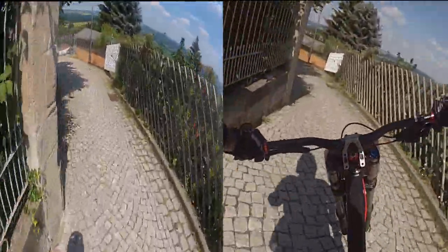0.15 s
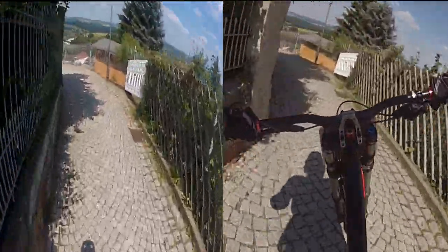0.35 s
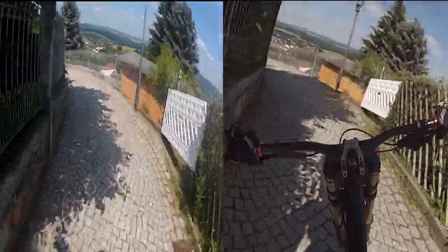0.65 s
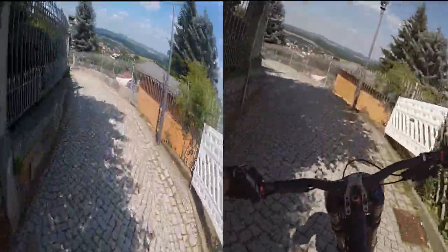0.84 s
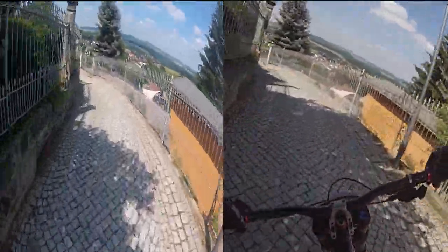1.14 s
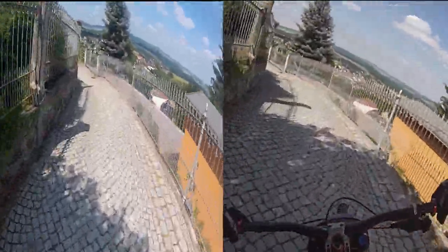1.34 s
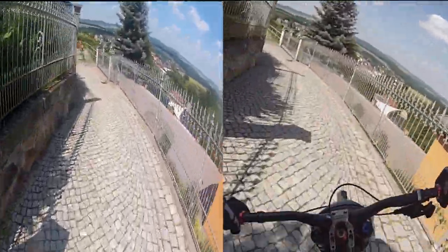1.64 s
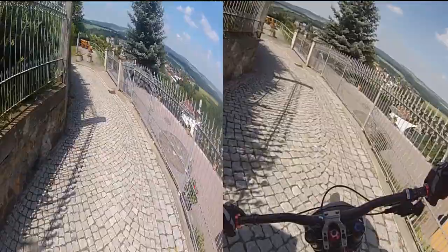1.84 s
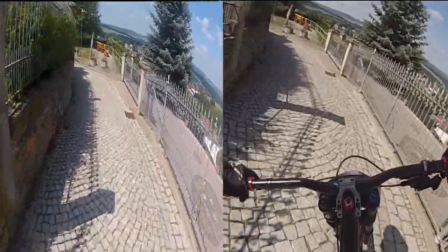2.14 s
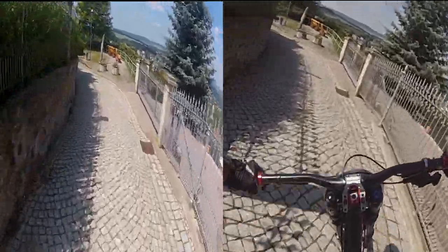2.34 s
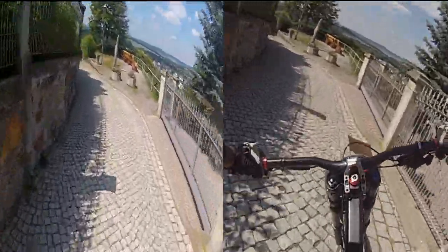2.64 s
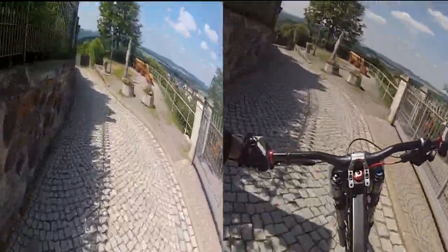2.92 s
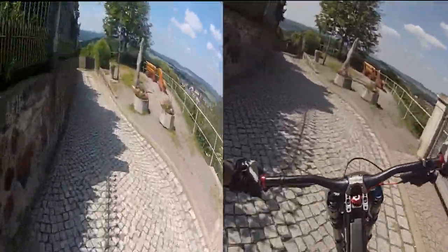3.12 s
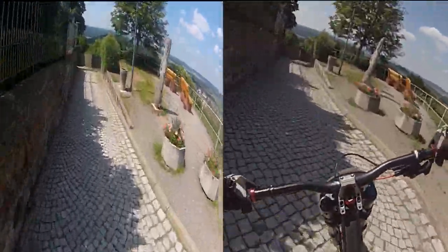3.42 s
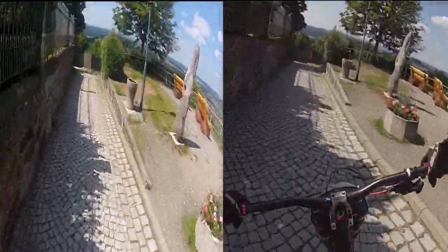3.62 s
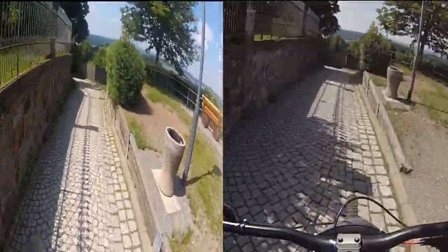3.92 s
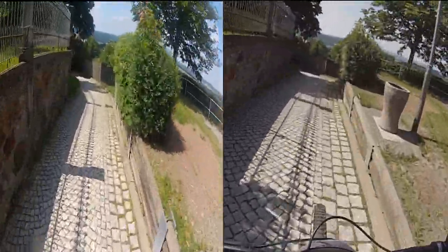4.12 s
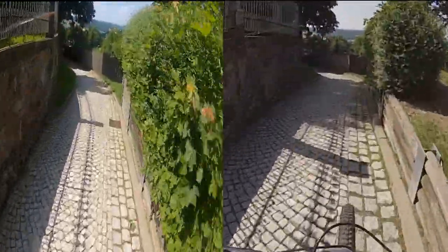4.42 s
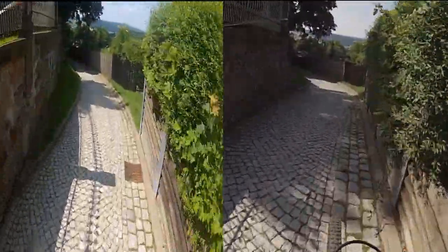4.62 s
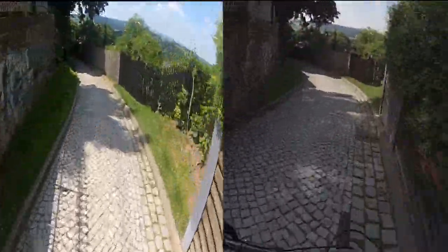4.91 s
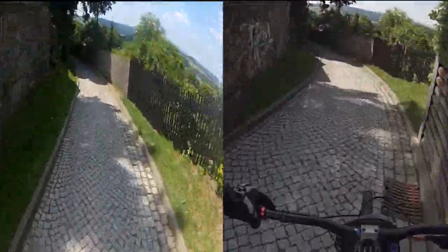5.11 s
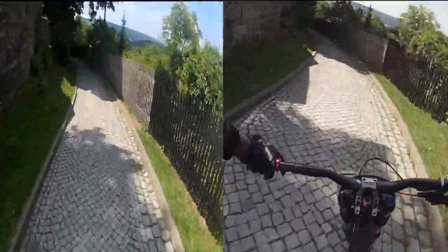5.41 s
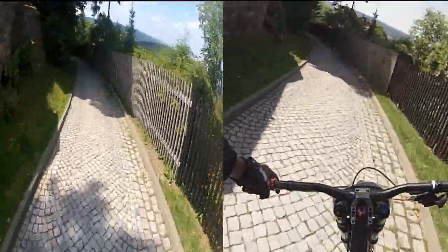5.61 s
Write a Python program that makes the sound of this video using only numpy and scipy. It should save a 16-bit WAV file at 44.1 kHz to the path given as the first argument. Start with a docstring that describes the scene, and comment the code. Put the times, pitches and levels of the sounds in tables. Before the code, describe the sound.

Rough, continuous cobblestone rumble from a bicycle, with thuds, dry clacks, chain ticks, a faint freehub buzz and lumpy wind on the microphone.

```python
"""A cobbled lane: a mountain bike coasts down it, heard from helmet and chest microphones, mixed to mono.
Wind is lumpy shaped noise; tyres and frame are resonances struck by uneven streams of stone blows.
Filtered bursts knock, thud and tick, shaped noise and grit hiss under the tread, the freehub buzzes.
Loose parts clatter, the chain jangles and the deep rumble surges around single pitches.
The chest signal is held at a slow clock, which adds fizz, and the mix overloads softly on peaks."""
import sys
import numpy as np
from scipy import signal
from scipy.fft import rfft, irfft
from scipy.io import wavfile
from scipy.ndimage import uniform_filter1d

SR = 44100
rng = np.random.default_rng(int(sys.argv[2]) if len(sys.argv) > 2 else 0)


def generate_wav(signal):
    """Clip the signal to [-1, 1] and save it as 16-bit WAV at the path in sys.argv[1]."""
    frames = np.transpose(np.atleast_2d(signal))
    scaled = np.clip(frames, -1, 1) * 32767
    pcm = np.round(scaled).astype(np.int16)
    wavfile.write(sys.argv[1], SR, pcm)


N = 254016   # samples


def from_db(db):
    """Amplitude factor of a level in dB."""
    return 10 ** (np.asarray(db) / 20)


def rms_one(x):
    """Scales the whole signal to rms 1."""
    return x / np.sqrt(np.mean(x ** 2) + 1e-20)


def in_time(rows):
    """Each level column of a curve, joined by straight lines."""
    s, *columns = np.transpose(rows)
    return [np.interp(np.arange(N) / SR, s, column) for column in columns]


def swells(rows):
    """Each event rises and falls evenly around its time; one curve for each level column."""
    t = np.arange(N) / SR
    return sum(np.outer(level, np.maximum(1 - 2 * np.abs(t - s) / length_s, 0))
               for s, length_s, *level in rows)


def steady(x, span_s):
    """Level held at rms 1 over the given span; faster flutter stays."""
    return x / np.sqrt(uniform_filter1d(x ** 2, max(int(span_s * SR), 2)) + 1e-12)


def cut(x, hz, kind, order):
    """Butterworth low- or high-pass."""
    return signal.sosfilt(signal.butter(order, min(hz, .45 * SR), kind, fs=SR, output="sos"), x)


def drift(rate_hz):
    """Slow random wander with a spread of 1, drawn every 40 samples and joined by straight lines."""
    step = 40
    r = np.exp(-2 * np.pi * rate_hz * step / SR)
    chance = rng.standard_normal(N // step + 2002)
    slow = signal.lfilter([1], [1, -2 * r, r * r], chance)[2000:]   # skip the filter's start-up
    return np.interp(np.arange(N) / step, np.arange(len(slow)), rms_one(slow))


def coloured_noise(spectrum):
    """Noise with the given spectrum, rms 1."""
    hz, db = np.transpose(spectrum)
    bins = np.maximum(np.fft.rfftfreq(N, 1 / SR), 1)
    shape = from_db(np.interp(np.log(bins), np.log(hz), db))
    return rms_one(irfft(rfft(rng.standard_normal(N)) * shape, N))


def resonate(force, modes):
    """Parallel resonances with alternating signs."""
    out = 0
    for k, (hz, width, db) in enumerate(modes):
        r = np.exp(-np.pi * width / SR)
        poles = [1, -2 * r * np.cos(2 * np.pi * hz / SR), r * r]
        zeros = [(1 - r * r) / 2, 0, -(1 - r * r) / 2]
        out = out + (-1) ** k * from_db(db) * signal.lfilter(zeros, poles, force + 1e-18)
    return out


def pulse_train(per_s, jitter, spread_db):
    """Clicks at uneven intervals and of uneven strength; per_s is the rate at the median interval."""
    chance = rng.standard_normal((6000, 2))
    at = (np.cumsum(np.exp(jitter * chance[:, 0])) / per_s * SR).astype(int)
    clicks = np.zeros(N)
    clicks[at[at < N]] = from_db(spread_db * np.clip(chance[at < N, 1], -2, 2))
    return clicks


def chatter(clicks, decay_s):
    """Each contact breaks up into a short, dying burst of noise."""
    envelope = signal.lfilter([1], [1, -np.exp(-1 / (decay_s * SR))], clicks + 1e-18)
    return envelope * rng.standard_normal(N)


def burst(decay_s):
    """One chattering contact that rises fast and dies, with a nearly even spectrum."""
    t = np.arange(SR // 10) / SR
    envelope = np.sqrt(t) * np.exp(-t / decay_s)
    grains = rng.standard_normal(len(t))
    for _ in range(2):   # flatten the spectrum
        spectrum = rfft(grains * envelope)
        grains = irfft(spectrum / (np.abs(spectrum) + 1e-12), len(t))
    return grains * envelope


def blows(events):
    """Places (t/s, level/dB, sound) blows, each with the energy of BLOW_S at the rms of its level."""
    BLOW_S = .008
    out = np.zeros(N + SR)
    for s, db, sound in events:
        start = max(int(s * SR), 0)
        level = from_db(db) * np.sqrt(BLOW_S * SR / np.sum(sound ** 2))
        out[start:start + len(sound)] += level * sound
    return out[:N]


STONES_PER_S = 68   # for each wheel, at the median interval


def stones(decay_s):
    """Both wheels strike sett after sett, each in its own uneven rhythm."""
    wheels = [pulse_train(STONES_PER_S, jitter=.35, spread_db=-0.5) for wheel in range(2)]
    return chatter(sum(wheels), decay_s)


# resonances of the tyres: [f/Hz, width/Hz, level/dB before the boom]
TYRE_MODES = [(138.7, 55, -0.2), (209.6, 85, 0.5), (300, 141, -3)]


def drumming(boom_db):
    """Soft tyres pass the low part of each blow; their deepest mode follows boom_db; rms 1."""
    force = stones(decay_s=0.013)
    deepest = from_db(boom_db - 0.6) * resonate(force, TYRE_MODES[:1])
    drum = deepest - resonate(force, TYRE_MODES[1:])
    return steady(cut(cut(drum, 472, "low", order=3), 90, "high", order=2), span_s=0.057)


# resonances of frame and mount, also rung by the thuds: [f/Hz, width/Hz, level/dB]
FRAME_MODES = [(358, 154, 0), (487, 137, 3), (591, 102, 3), (762, 260, -6.5)]


def shaking():
    """Frame and mount shudder on every stone; rms 1."""
    shake = resonate(stones(decay_s=0.0095), FRAME_MODES)
    return steady(cut(cut(shake, 884, "low", order=4), 337, "high", order=2), span_s=0.071)


# spectrum of the tread's hiss: [f/Hz, relative level/dB per Hz]
HISS_SPECTRUM = [(300, -14), (900, 1.5), (1300, 2), (1800, -2), (2400, -1), (3000, 0), (3500, -5),
                 (4200, -9), (5200, -15.5), (6000, -39)]


def hiss(level_db):
    """Tread scuffing the stone, with grit crackling under it in the two lowest chain modes."""
    contacts = chatter(pulse_train(330, jitter=.8, spread_db=-0.5), decay_s=0.0036)
    grit = cut(resonate(contacts, CHAIN_MODES[:2]), 2870, "low", order=4)
    scuff = from_db(1.0 * drift(34)) * coloured_noise(HISS_SPECTRUM)
    return from_db(level_db) * (scuff + from_db(-11.0) * rms_one(grit))


# resonances of the freehub shell: [f/Hz, width/Hz, level/dB]
HUB_MODES = [(2620, 19, 5.5), (3920, 260, -9.5), (4420, 350, -2.5), (4710, 360, 3), (5200, 980, -8)]
# the buzz while the rider coasts, before flares, waver and pause: [t/s, level/dB]
COASTING = [(0, -42.5), (1.1, -46), (2.7, -46.5), (3.1, -44.5), (4.3, -43), (4.9, -44), (5.76, -46.5)]
# the buzz flares up: [t/s, length/s, extra level/dB]
HUB_FLARES = [(.09, .07, 5.5), (.45, .1, 3), (1.64, .09, 3), (3.008, .06, 6), (3.17, .06, 1),
              (4.62, .06, 5), (5.176, .08, 7)]
# the buzz dies down for a moment: [start t/s, end t/s, fade/s]
HUB_PAUSE = (3.33, 4.15, 0.035)
HUB_WAVER_DB = 0.9   # spread of the waver


def freehub():
    """Pawls snap over the ratchet teeth so fast that they merge into a wavering, flaring buzz."""
    level_db, = in_time(COASTING) + swells(HUB_FLARES)
    start, end, fade_s = HUB_PAUSE
    t = np.arange(N) / SR
    coasting = np.clip(np.maximum(start - t, t - end) / fade_s + .5, from_db(-7), 1)   # 7 dB dip
    pawls = chatter(pulse_train(260, jitter=.15, spread_db=2.0), decay_s=0.0045)
    buzz = steady(resonate(pawls, HUB_MODES), span_s=0.092)
    return from_db(level_db + HUB_WAVER_DB * drift(16)) * coasting * buzz


# spectrum of the wind before its large eddies are thinned: [f/Hz, relative level/dB per Hz]
WIND_SPECTRUM = [(8, -15), (20, 8), (35, -3), (58, 4.5), (85, 1.5), (120, -1.5), (250, -23.5), (700, -22),
                 (2000, -59.5)]
# wind at the helmet between gusts, before trim: [t/s, level/dB]
BREEZE = [(0, -18.5), (0.9, -18.5), (1.2, -30), (1.7, -23.5), (2.3, -20.5), (3.1, -18), (3.35, -25),
          (4.0, -23), (4.45, -23.5), (5.0, -22.5), (5.4, -16), (5.76, -21)]
# single buffets, lifting or easing the breeze: [t/s, length/s, extra level/dB]
GUSTS = [(.07, 0.18, 0.5), (.26, 0.081, 5.5), (.35, 0.23, 4), (.54, 0.06, -3), (.65, 0.085, 4.5),
         (.77, 0.069, 7), (1.05, 0.26, 7.5), (1.4, 0.24, 9.5), (1.73, 0.21, 7), (1.85, 0.045, 13),
         (2.2, .11, 6), (2.65, 0.1, 9.5), (3.55, 0.11, 6), (3.77, 0.22, 7), (3.99, 0.15, 13),
         (4.16, 0.066, 10), (4.53, 0.1, 8), (4.91, .06, 5)]
# spectrum of the rushing air: [f/Hz, relative level/dB per Hz]
AIR_SPECTRUM = [(1000, 11), (4000, 0), (6000, 1.5), (8000, 0.5), (9300, 3), (11000, -3), (13500, 1),
                (15300, -24), (17000, -11)]
# air rushing past the helmet, before trim: [t/s, level/dB]
RUSH = [(0, -52), (.33, -48.5), (.52, -53), (2.0, -52), (2.35, -54), (3.0, -54), (3.75, -54.5), (4.05, -65),
        (4.3, -60), (4.95, -54), (5.13, -46.5), (5.65, -61)]


def wind(boom_db):
    """Lumpy turbulence at the port, its large eddies weaker as boom_db rises, under a thin rush of air."""
    gust_db, = in_time(BREEZE) + swells(GUSTS)
    rush_db, = in_time(RUSH)
    eddies = coloured_noise(WIND_SPECTRUM)
    large = cut(eddies, 45, "low", order=1)
    buffets = steady(eddies - large + from_db(-0.8 * boom_db) * large, span_s=0.074)
    rush = from_db(rush_db + 9.5) * coloured_noise(AIR_SPECTRUM)
    return from_db(gust_db + 2.4) * buffets + rush


# what the small parts ring with: [f/Hz, width/Hz, level/dB]
CLATTER_MODES = [(322, 160, 8), (645, 76, 4.5), (872, 117, -0.5), (1080, 470, -2.5), (1510, 480, -8)]
# small parts clatter on the rougher stretches, before trim: [t/s, level/dB]
CLATTER = [(0, -52), (.9, -39.5), (2.4, -40), (2.7, -30), (2.9, -35.5), (3.3, -34), (3.85, -38), (4.5, -39),
           (4.85, -32.8), (5.76, -28)]
CLATTER_PER_S, CLATTER_SPREAD_DB = 85, 0.5   # touches per second at the median interval, unevenness


def rattles():
    """Loose small parts touch again and again and ring in a running clatter."""
    clatter_db, = in_time(CLATTER)
    clicks = pulse_train(CLATTER_PER_S, jitter=.5, spread_db=CLATTER_SPREAD_DB)
    touches = chatter(clicks, decay_s=0.0068)
    clatter = cut(resonate(touches, CLATTER_MODES), 1080, "high", order=3)
    return from_db(clatter_db - 3.0) * steady(cut(clatter, 1970, "low", order=3), span_s=0.22)


# resonances of the drive train's metal, the first two also for grit: [f/Hz, width/Hz, level/dB]
CHAIN_MODES = [(2100, 560, 10), (2980, 540, 5.5), (3880, 160, 3.5), (4900, 990, -3), (8260, 2500, -4)]
# chain and cables tick against the frame: [t/s, level/dB, pitch f/Hz]
TICKS = [(.356, -35, 2800), (.3985, -33, 2300), (.582, -41, 3000), (.616, -35, 2800), (.641, -36, 3200),
         (.66, -38, 3600), (.678, -39, 2800), (.72, -41, 2700), (0.867, -34, 4000), (1.334, -32.5, 2700),
         (1.548, -36.5, 3800), (2.022, -32.5, 2200), (3.002, -33.5, 3600), (3.236, -39, 2200),
         (4.594, -37, 2400), (4.632, -35, 2800), (4.677, -31, 3200), (4.822, -32, 2400), (4.954, -30, 2400),
         (5.172, -40, 3000)]
# the chain jangles in short bursts: [t/s, length/s, peak level/dB]
JANGLES = [(.09, .08, -41), (0.415, 0.11, -41), (0.652, 0.34, -40)]
TICK_FOCUS_DB = 14   # loss per octave away from a tick's pitch


def ticks():
    """Light metallic touches, alone and in jangles; each lone touch favours the modes near one pitch."""
    shaken = swells([(s, length_s, from_db(db)) for s, length_s, db in JANGLES])[0]
    contacts = chatter(pulse_train(110, jitter=0.88, spread_db=1.0), decay_s=0.0023)
    links = resonate(contacts, CHAIN_MODES)
    touches = []
    for s, db, pitch_hz in TICKS:
        modes = [(hz, width, mode_db - TICK_FOCUS_DB * abs(np.log2(hz / pitch_hz)))
                 for hz, width, mode_db in CHAIN_MODES]
        touch = resonate(burst(decay_s=0.0077), modes)
        touches.append((s, db, cut(touch, 4800, "low", order=3)))
    return blows(touches) + shaken * steady(links, span_s=.05)


# surges of the deep rumble: [centre t/s, length/s, f/Hz, peak level/dB]
BOOMS = [(.17, 0.084, 235, -14.5), (.26, 0.081, 196, -12.5), (.39, 0.089, 180, -15), (1.0, 0.087, 120, -19),
         (1.15, .09, 227, -19), (1.45, 0.092, 219, -19), (2.25, 0.077, 150, -16), (2.66, 0.093, 153, -14),
         (2.94, .07, 149, -14), (3.19, 0.083, 201, -16), (3.27, 0.12, 139, -13), (3.37, 0.12, 141, -15),
         (3.43, 0.098, 205, -13), (3.7, 0.091, 134, -11.5), (3.81, .12, 301, -16.5),
         (3.86, 0.082, 172, -12), (4.21, .08, 149, -15), (4.4, .14, 174, -14), (4.57, .11, 174, -11),
         (4.92, 0.089, 288, -11), (5.21, 0.23, 186, -10.5), (5.37, 0.088, 271, -11.5),
         (5.52, 0.094, 163, -11.5), (5.74, 0.11, 188, -9.5)]
BOOM_WIDTH_HZ = 24


def booms():
    """Short surges in which the rumble gathers around one pitch: noise through a narrow resonance."""
    out = np.zeros(N + SR)
    for s, length_s, hz, db in BOOMS:
        size = int(length_s * SR)
        ringing = resonate(rng.standard_normal(SR // 2), [(hz, BOOM_WIDTH_HZ, 0)])
        ringing = steady(cut(ringing, 426, "low", order=4), span_s=0.047)
        start = max(int((s - length_s / 2) * SR), 0)
        out[start:start + size] += from_db(db) * np.hanning(size) * ringing[-size:]
    return out[:N]


# deep joints that make the frame thud: [t/s, level/dB]
THUDS = [(.27, -18), (.402, -19), (.451, -18.5), (.519, -21), (.634, -18), (.803, -19), (1.009, -13),
         (1.089, -22), (1.139, -16), (1.449, -12), (1.503, -17), (1.683, -24), (2.045, -18), (2.255, -15),
         (2.296, -15), (2.333, -12.5), (2.795, -17), (3.021, -14.5), (3.325, -15), (3.42, -16),
         (3.622, -13), (3.807, -19), (4.058, -15), (4.116, -15), (4.46, -16), (4.651, -11.5), (4.756, -20),
         (4.809, -17), (5.161, -19.5), (5.203, -16), (5.316, -12), (5.491, -17)]


def thuds():
    """A wheel drops into a deep joint and the frame rings once."""
    events = []
    for s, db in THUDS:
        ring = resonate(burst(decay_s=0.0072), FRAME_MODES)
        events.append((s, db, cut(ring, 856, "low", order=4)))
    return blows(events)


# hard stones that make the bike knock: [t/s, level/dB, upper edge f/Hz]
KNOCKS = [(0.277, -25, 1050), (0.407, -27, 1300), (.456, -23.5, 1740), (.522, -31, 1600), (.637, -31, 1500),
          (.673, -31, 1500), (.804, -30, 1300), (0.949, -29, 1390), (1.083, -27, 1490), (1.162, -29, 1450),
          (1.455, -24, 1100), (1.501, -28, 1150), (1.745, -27.5, 1680), (2.236, -17, 950),
          (2.257, -28, 1250), (2.332, -26, 1100), (2.619, -31, 1700), (2.662, -29, 1400),
          (2.754, -22, 1200), (2.797, -31, 1640), (3.234, -26.5, 2150), (3.333, -21, 1190),
          (3.385, -23.5, 1780), (3.425, -28, 1440), (3.513, -24, 1350), (3.534, -24, 1450),
          (3.579, -21, 1150), (4.006, -23.5, 1940), (4.252, -25, 1250), (4.83, -27, 1400),
          (4.93, -27, 1400), (5.415, -22, 1630), (5.621, -25, 1400), (5.731, -28, 1400)]


def knocks():
    """Dry clacks on the hardest stones: the sharper the edge, the higher the clack reaches."""
    events = []
    for s, db, top_hz in KNOCKS:
        clack = cut(burst(decay_s=0.0054), 500, "high", order=2)
        events.append((s, db, cut(clack, top_hz, "low", order=6)))
    return blows(events)


# the rumble of the ride, before trim: [t/s, tyre drumming level/dB, frame shake level/dB]
RIDE = [(0, -16, -23), (0.48, -18, -25), (0.68, -17, -20.5), (1.2, -18.5, -21.5), (1.9, -18, -18.5),
        (2.6, -15, -20), (3.0, -14.5, -18.5), (3.3, -10, -18), (3.7, -11.5, -19), (4.2, -13, -18.5),
        (4.7, -10.5, -17.5), (5.25, -10, -15), (5.76, -9, -15)]
# short patches that ease or shift the rumble: [t/s, length/s, drumming change/dB, shake change/dB]
LULLS = [(.11, .08, -1, -2), (.34, 0.098, -2, -3), (.495, 0.098, -3, -3), (.75, .05, -2, -3),
         (.94, .06, 2.5, -1), (1.23, 0.13, -4, -1.5), (1.585, 0.073, -0.5, -4), (1.735, 0.044, -2, -4),
         (1.93, 0.07, -6, 2), (3.0, 0.1, -6, 1.5), (3.54, 0.22, -2.5, 4.5), (3.745, .06, -3, 4),
         (3.91, 0.039, -2, 2), (4.19, 0.1, 1.5, -2.5), (4.29, 0.061, -3, 3), (4.59, 0.13, -1, -3),
         (4.73, 0.036, -1, -0.5), (4.86, .07, -4, -1), (5.62, 0.11, -3, -0.5)]
# bumps in the paving that briefly reshape the rumble: [t/s, length/s, drumming change/dB, shake change/dB]
BUMPS = [(.04, 0.091, 5.5, -0.5), (.27, .08, 3.5, 3.5), (.53, 0.04, 7.5, 3), (.66, 0.21, 3.5, 0),
         (.82, 0.15, 3, 1), (1.02, 0.24, 3, 1), (1.14, 0.16, 1.5, 3.5), (1.33, 0.074, 6.5, 3),
         (1.45, 0.037, 10, 7.5), (1.51, 0.036, 9, 1.5), (1.72, 0.32, 0, 2), (2.02, 0.1, 6, -1),
         (2.25, 0.061, 6, 3.5), (2.66, 0.58, 0.5, 4), (3.19, 0.046, 4, 4.5), (3.63, 0.074, 3.5, 1),
         (3.82, 0.083, 1, 2), (4.08, 0.064, 2, 4), (4.22, 0.11, 2.5, -2), (4.45, 0.28, 2.5, 0),
         (5.37, 0.037, 3.5, -1), (5.52, 0.095, 4, -0.5)]
# tread scuffing the stone, before the throb: [t/s, level/dB]
TREAD = [(0, -37), (.55, -38), (.9, -39.5), (2.35, -38), (2.6, -37), (3.0, -36), (3.4, -37.5), (3.9, -36),
         (4.5, -34), (5.1, -33), (5.76, -33.5)]
# the deepest tyre mode gains 0.33 dB per dB of drumming above -14 dB
BOOM_FOLLOWS, BOOM_FROM_DB = 0.33, -14
ROAR_DB = -2   # even roar at the chest, against the frame shake
WHEEL_TURNS_PER_S = 2.9


def scene():
    """Chest and helmet rows: separate noise for each path; the body shields the chest from jolts."""
    drum_db, shake_db = in_time(RIDE) + swells(LULLS)
    bump_drum_db, bump_shake_db = swells(BUMPS)
    tread_db, = in_time(TREAD)
    boom_db = BOOM_FOLLOWS * (drum_db - BOOM_FROM_DB)
    turns = WHEEL_TURNS_PER_S * np.arange(N) / SR
    throb_db = 0.21 * np.sin(2 * np.pi * turns)   # one swell per wheel turn
    drum = from_db(drum_db + bump_drum_db - 3.0)
    shake = from_db(shake_db + bump_shake_db - 0.75)
    roar = from_db(shake_db + ROAR_DB + throb_db)
    # the uneven part of the shaking, never quite silent
    jolts = np.sqrt(np.maximum(shake ** 2 - roar ** 2, 0.085 * shake ** 2))
    chest = drum * drumming(boom_db) + roar * shaking() + hiss(tread_db + throb_db) + freehub()
    helmet = drum * drumming(boom_db) + jolts * shaking() + wind(boom_db) + rattles()
    helmet = helmet + ticks() + booms() + thuds() + knocks()
    return np.array([chest, helmet])


HOLD_HZ, CUTOFF_HZ = 12000, 15350   # chest sample clock, upper edge of the mix


def record(dry):
    """Holding each slow chest sample mirrors its sound around the clock rate; the mono mix overloads."""
    chest, helmet = dry
    sampled = signal.resample_poly(chest, HOLD_HZ, SR)
    held = signal.resample_poly(np.repeat(sampled, 8), SR, 8 * HOLD_HZ)[:N]
    mix = held + helmet
    overloaded = mix / (1 + np.abs(mix) ** 16) ** (1 / 16)   # bends only near full scale
    low_pass = signal.ellip(10, .1, 80, CUTOFF_HZ, fs=SR, output="sos")
    out = signal.sosfilt(low_pass, overloaded)
    return np.array([out, out])


dry = scene()
out = record(dry)
generate_wav(out)
```